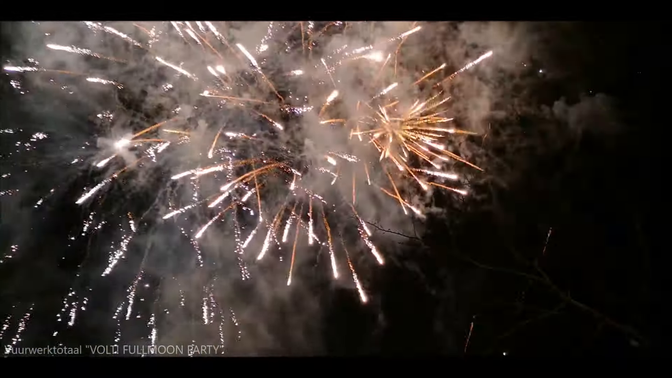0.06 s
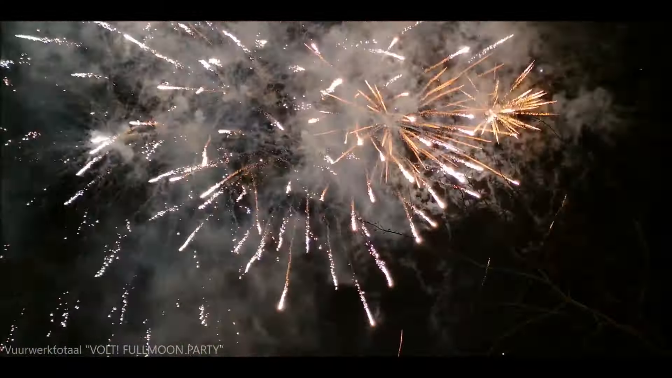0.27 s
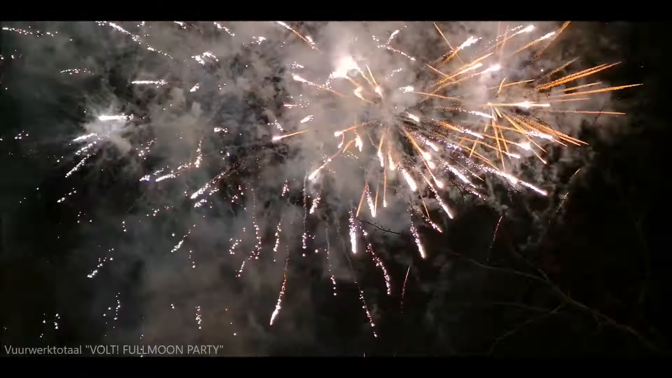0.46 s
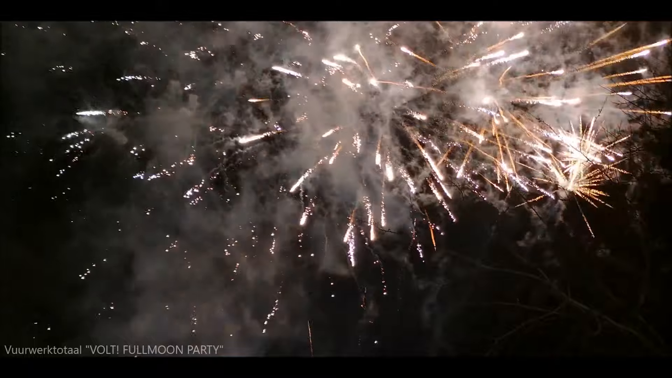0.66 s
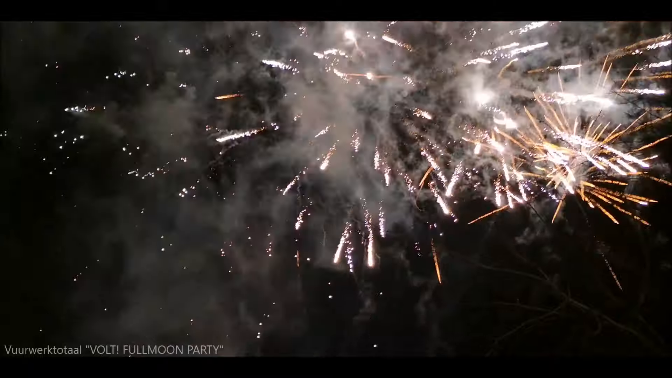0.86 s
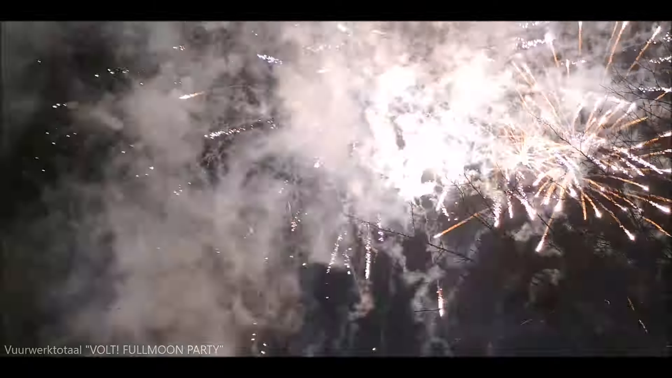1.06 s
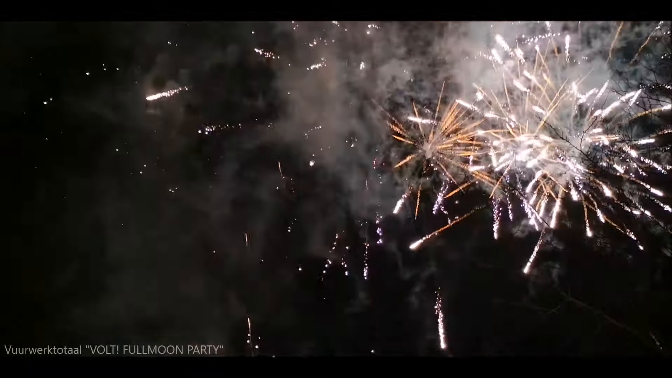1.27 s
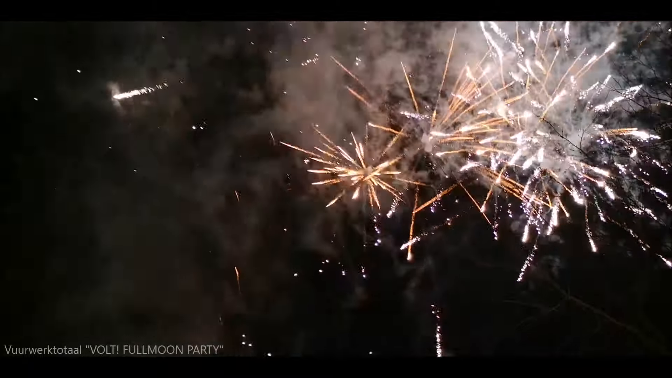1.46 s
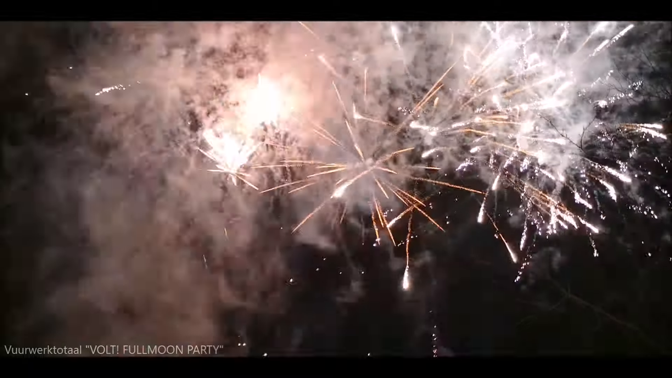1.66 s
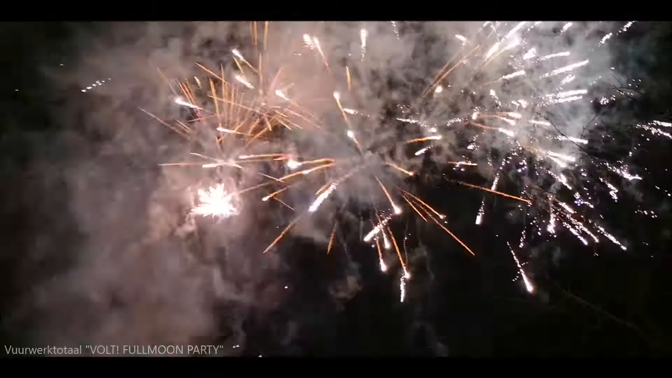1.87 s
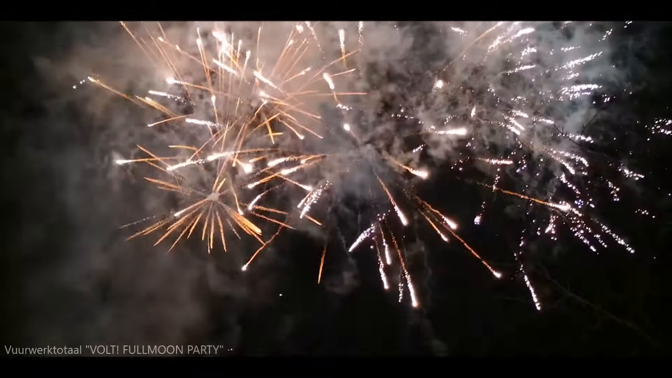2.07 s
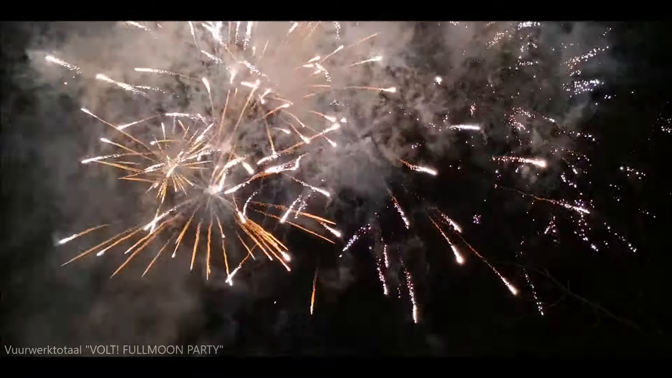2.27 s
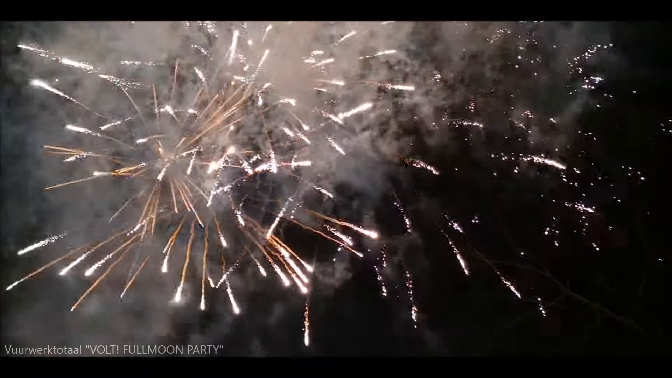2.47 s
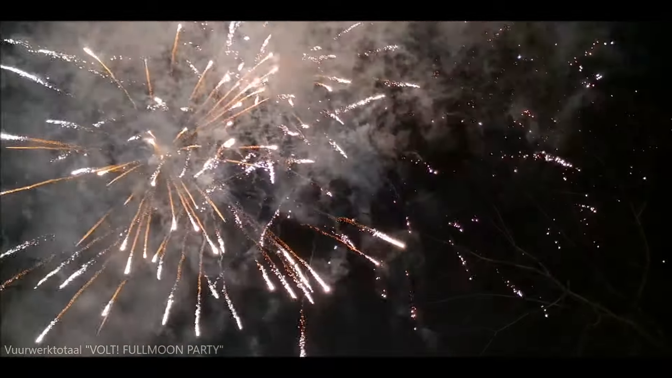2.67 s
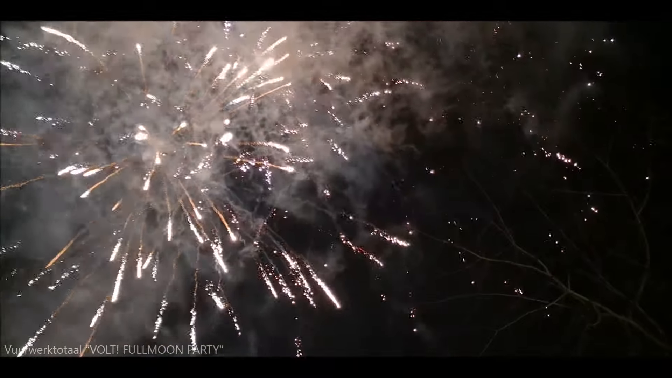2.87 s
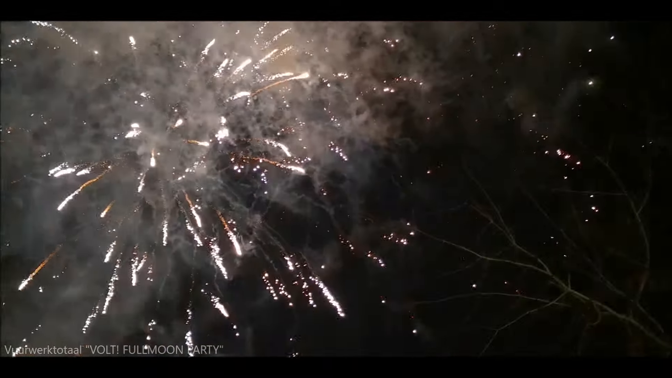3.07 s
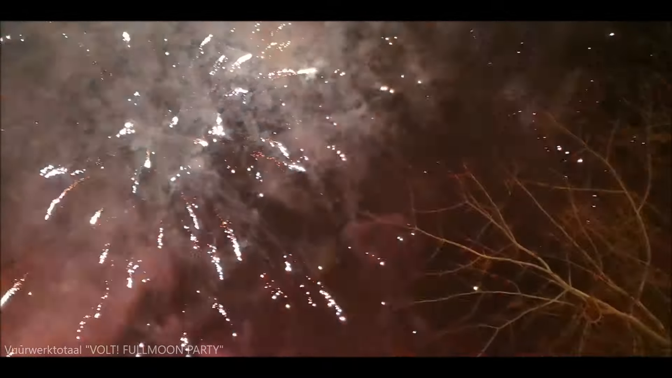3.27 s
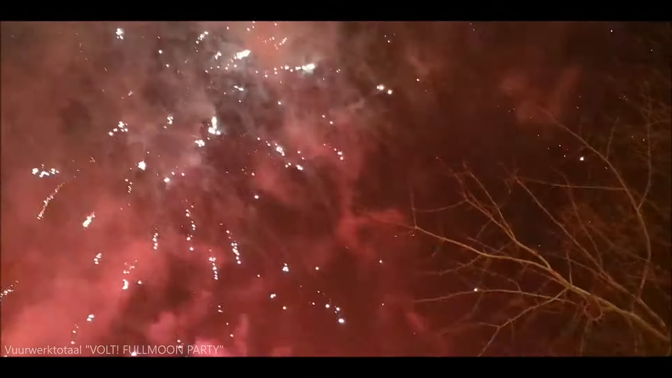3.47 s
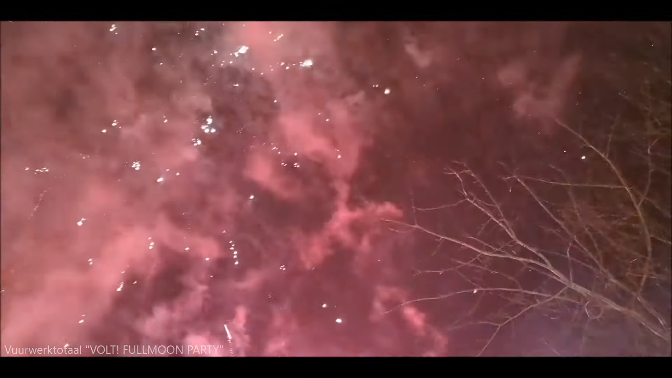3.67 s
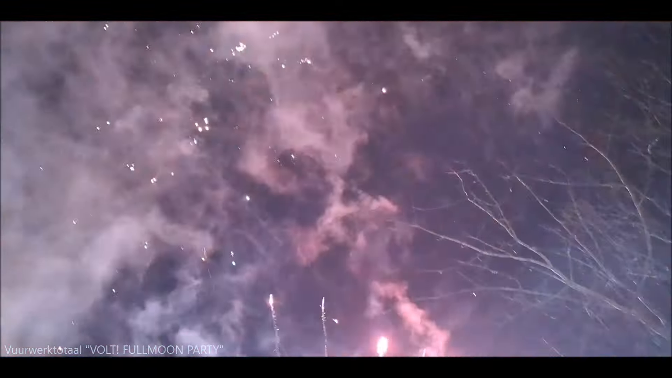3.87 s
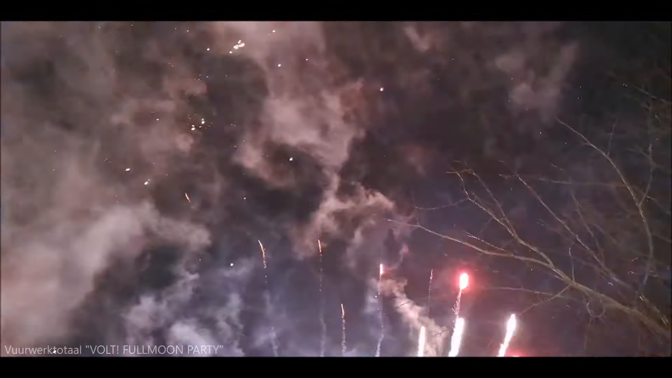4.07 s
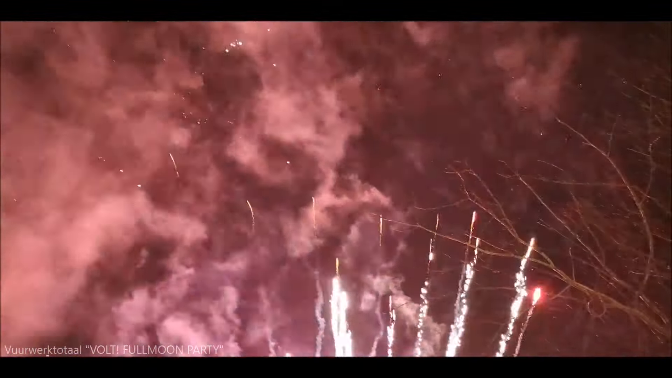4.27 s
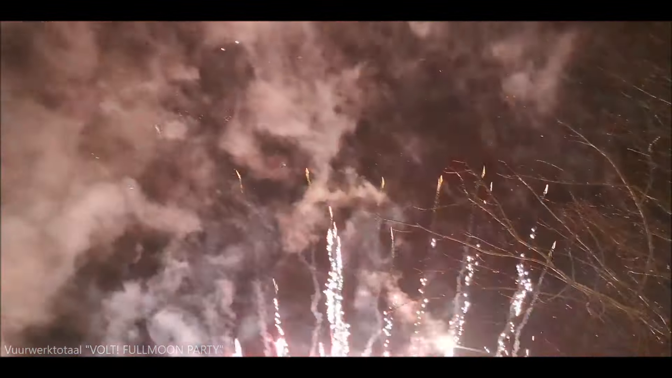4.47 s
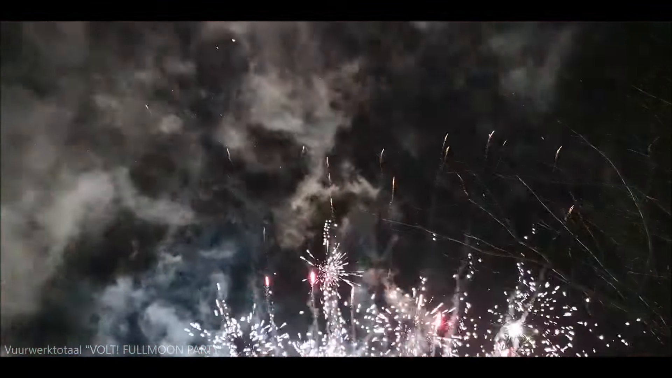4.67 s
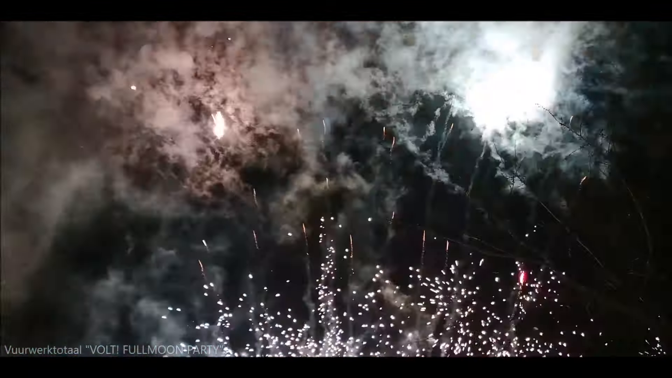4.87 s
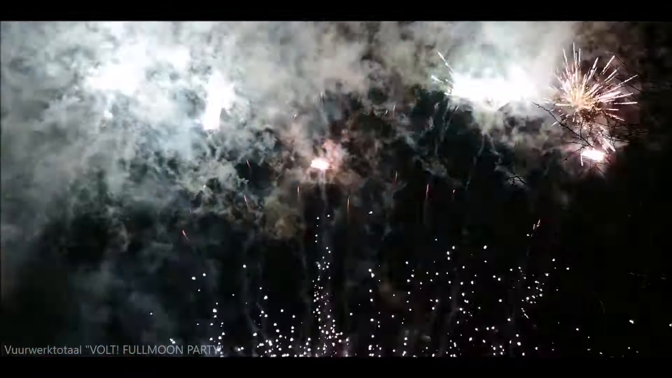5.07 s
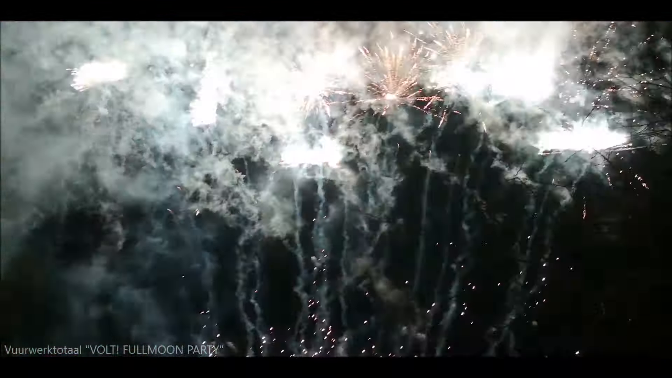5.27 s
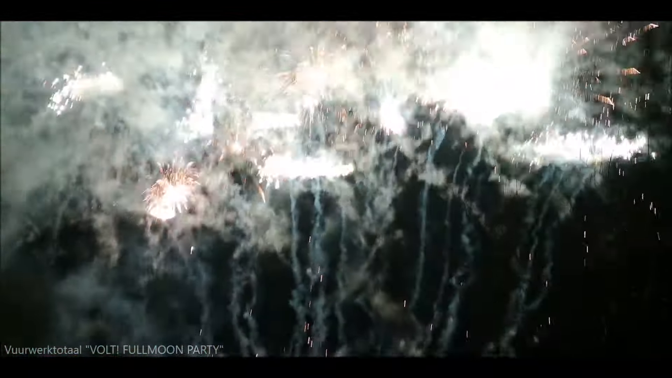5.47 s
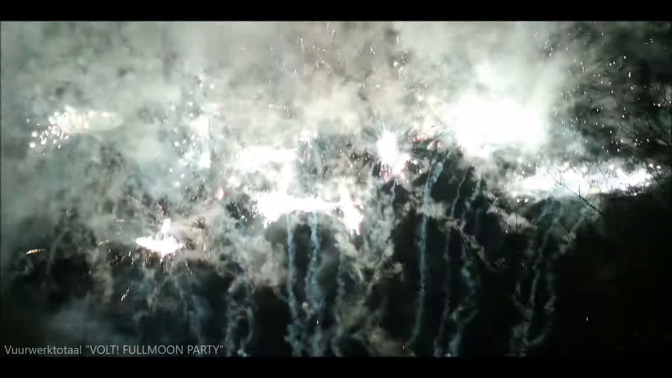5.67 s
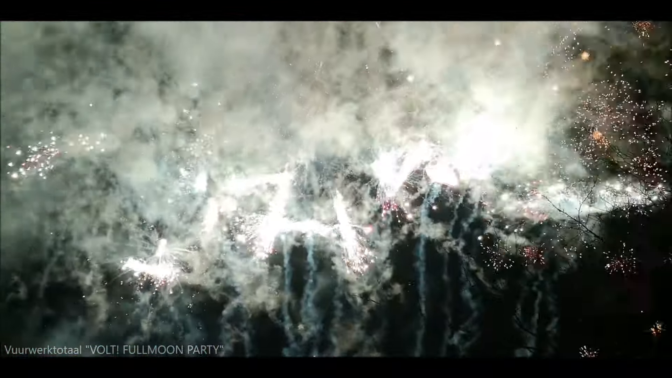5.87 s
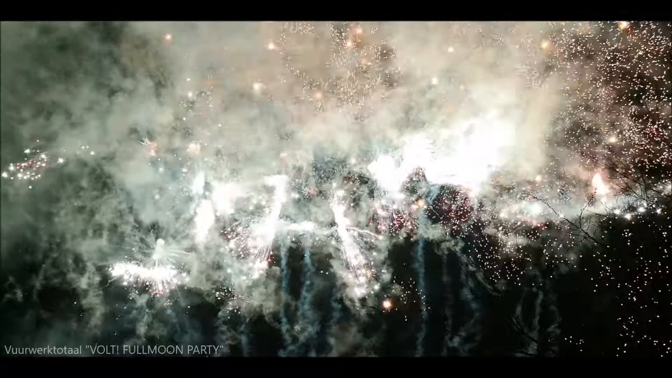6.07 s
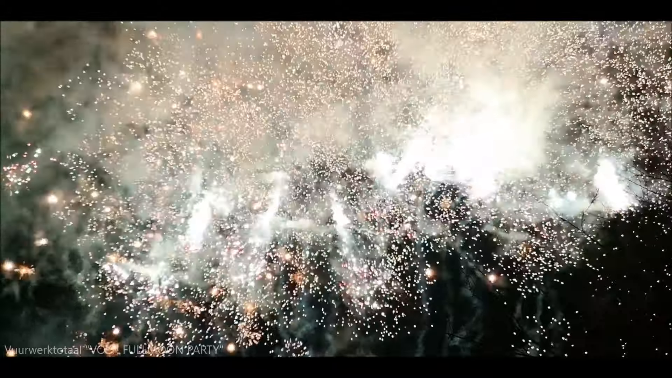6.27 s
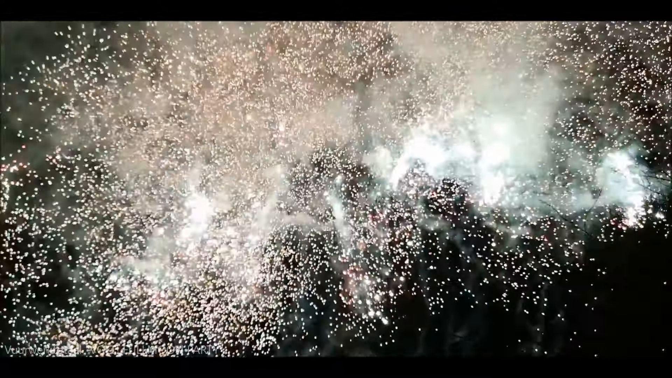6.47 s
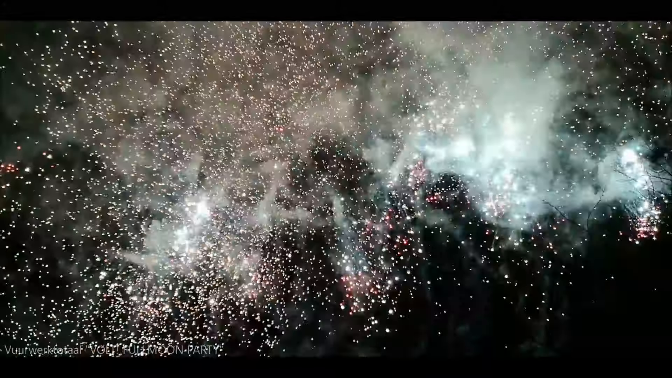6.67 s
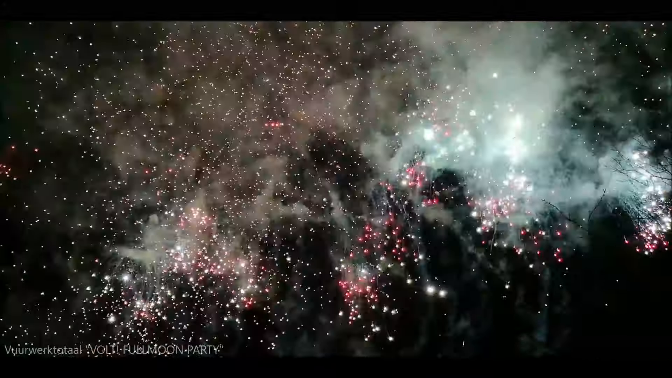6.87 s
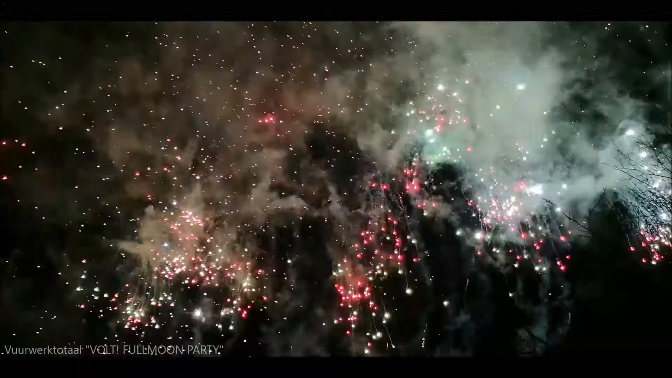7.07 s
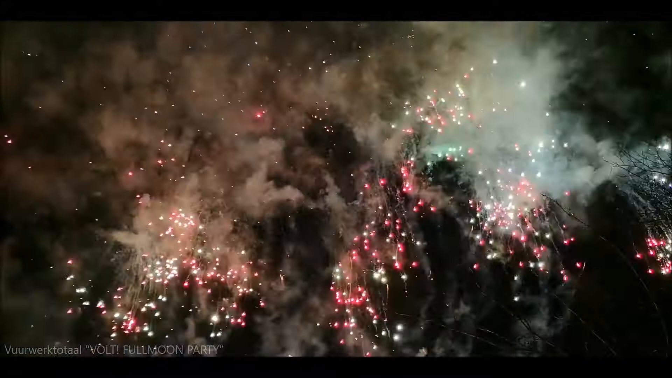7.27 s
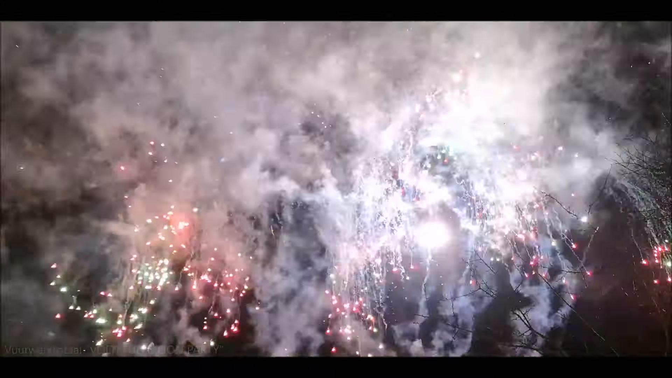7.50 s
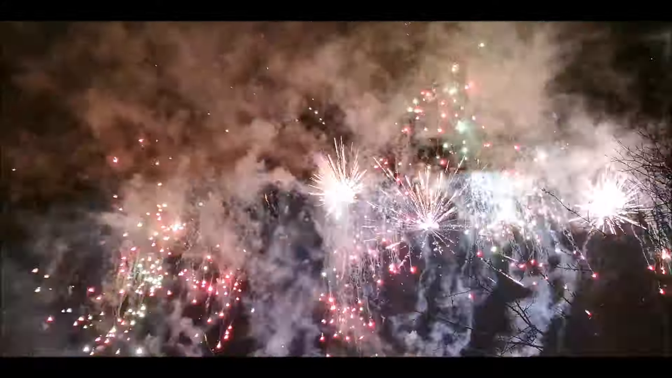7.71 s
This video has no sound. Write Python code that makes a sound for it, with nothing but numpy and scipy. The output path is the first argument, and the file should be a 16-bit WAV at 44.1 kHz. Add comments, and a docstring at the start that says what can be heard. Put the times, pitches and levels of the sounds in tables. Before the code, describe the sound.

A multi-shot firework bangs overhead, fires quick thumping volleys, then fills the night air with waves of dense crackling over a distant rumble.

```python
"""A fireworks cake outdoors at night, close enough to overload a phone's two microphones.
Over the echo of an earlier shell, a few tubes thump and shells burst overhead, each shock followed by
its bounce off the ground. Roll and hiss pile up, dipping at each bang. Past three seconds a quick volley
leaves the tubes and a cloud of crackling stars swells and thins. More shells burst just after five
seconds; a last short volley fires amid more crackle, and one more cloud closes the scene."""
import sys
import numpy as np
from scipy import signal
from scipy.fft import rfft, irfft
from scipy.io import wavfile

SR = 44100
rng = np.random.default_rng(int(sys.argv[2]) if len(sys.argv) > 2 else 0)


def dump(signal):
    """Clip the signal to [-1, 1] and save it as 16-bit WAV at the path in sys.argv[1]."""
    limited = np.clip(np.atleast_2d(signal).T, -1, 1)
    pcm = np.round(limited * 32767).astype(np.int16)
    wavfile.write(sys.argv[1], SR, pcm)


N = 341325
TIME = np.arange(N) / SR
COARSE_TIME = TIME[::32]  # for slowly moving levels
LEFT_MINUS_RIGHT = np.array([[1], [-1]])


def undb(db):
    """Decibels to gain."""
    return 10 ** (np.asarray(db) / 20)


def unit(x):
    """Scale to rms 1."""
    return x / np.sqrt(np.mean(x ** 2))


def colour(x, points):
    """Causal filter with a spectrum of (Hz, dB) points; white noise keeps its power."""
    size = 4096
    hz, db = np.transpose(points)
    bin_hz = np.maximum(np.arange(size // 2 + 1) * SR / size, 1)
    gain = unit(undb(np.interp(np.log(bin_hz), np.log(hz), db)))
    cepstrum = irfft(np.log(gain))
    cepstrum[1:size // 2] *= 2  # fold to minimum phase
    cepstrum[size // 2 + 1:] = 0
    impulse = irfft(np.exp(rfft(cepstrum)))
    return signal.fftconvolve(x, impulse[None], axes=1)[:, :N]


def shade(x, points):
    """Weight a long sound by a spectrum of (Hz, dB) points."""
    hz, db = np.transpose(points)
    bin_hz = np.arange(N // 2 + 1) * SR / N
    return irfft(rfft(x) * undb(np.interp(bin_hz, hz, db)), N)


def add(out, s, sound, lag=0):
    """Mix a sound in at s seconds; the left microphone hears it lag samples after the right."""
    for channel, part in enumerate(np.broadcast_to(sound, (2, sound.shape[-1]))):
        start = max(int(s * SR) - lag // 2 + (lag if channel == 0 else 0), 0)
        room = max(min(len(part), N - start), 0)
        out[channel, start:start + room] += part[:room]


def widen(pair, side_db):
    """Two unrelated signals, taken as mid and side, become left and right."""
    return unit(pair[0] + undb(side_db) * pair[1] * LEFT_MINUS_RIGHT)


def grains(per_s, spread_db, channels=2):
    """Random impulses: many small, a few large."""
    size = undb(spread_db * np.minimum(rng.exponential(size=(channels, N)), 3))
    return size * (rng.random((channels, N)) < per_s / SR)


def lobe(t, peak_s):
    """A smooth push that peaks at 1 and dies away."""
    return (t / peak_s * np.exp(1 - t / peak_s)) ** 2


def ring(t, modes, detune):
    """Damped (Hz, decay s, dB) modes, tuned a little differently at every shot."""
    out = 0
    for hz, decay_s, db in modes:
        pitch_hz = hz * (1 + detune * rng.standard_normal())
        out = out + undb(db) * np.exp(-t / decay_s) * np.sin(2 * np.pi * pitch_hz * t)
    return out


def spit(t, decay_s):
    """A very short rush of unit energy, different at each microphone."""
    noise = rng.standard_normal((2, len(t))) * np.exp(-t / decay_s)
    return noise / np.linalg.norm(noise, axis=1, keepdims=True)


def tails(shots, db, fall_db_per_s):
    """Level left by (s, relative dB) shots: each dies away steadily and their powers add up."""
    t, power = COARSE_TIME, 0
    for s, shot_db in shots:
        level = undb(db + shot_db - fall_db_per_s * np.maximum(t - s, 0))
        power = power + (t >= s) * level ** 2
    return np.interp(TIME, t, np.sqrt(power))


def lingering_shots():
    """Three lists of (s, relative dB): the shells' far echoes, the shells' hiss and the launches."""
    earlier_shell_s = -0.17  # still echoing as the scene opens
    echoes = [(earlier_shell_s, 2.5)] + [(s, echo_db) for s, *_, echo_db, _ in BURSTS]
    hisses = [(earlier_shell_s, 0)] + [(s, hiss_db) for s, *_, hiss_db in BURSTS]
    return echoes, hisses, [(s, 0) for s, *_ in LAUNCHES]


def dips():
    """Gain of the background: it drops at each bang and under the crackle; the deepest dip counts."""
    t = COARSE_TIME
    db = np.zeros(len(t))
    for shots, depth_db, hold_s, recovery_s in ((BURSTS, -10, 0.028, 0.094), (LAUNCHES, -4, 0.014, 0.096)):
        corners_s = [0, hold_s, hold_s + recovery_s]
        for s, *_ in shots:
            db = np.minimum(db, np.interp(t - s, corners_s, [depth_db, depth_db, 0], left=0))
    depth_db, attack_s, hold_s, recovery_s = -9.5, 0.038, 0.199, 0.094
    for start_s, swell_s, thin_s, *_ in CLOUDS:
        rise_s = start_s + swell_s + thin_s + hold_s
        corners_s = [start_s, start_s + attack_s, rise_s, rise_s + recovery_s]
        db = np.minimum(db, np.interp(t, corners_s, [0, depth_db, depth_db, 0]))
    return np.interp(TIME, t, undb(db))


# The roll sounds wide from about 500 Hz up and nearly centred in the bass.
# Each row: frequency in Hz, gain of the side signal in dB.
ROLL_WIDTH = [(60, -17), (200, -11.5), (320, -6), (480, 8.5), (700, 11.5), (1100, 12)]

def rumble(spectrum, side_db):
    """A dense train of dull reflections."""
    reflections = grains(per_s=700, spread_db=2.5) * rng.choice([-1, 1], (2, N))
    mid, side = colour(reflections, spectrum)
    return (mid + undb(side_db) * shade(side, ROLL_WIDTH) * LEFT_MINUS_RIGHT) / np.std(mid)


# The distant roll after shells, tubes and crackle. Each row: frequency in Hz, relative level in dB.
SHELL_ROLL_COLOUR = [(20, -12.5), (50, -12.5), (90, -1.5), (150, -2.5), (270, -3), (400, -8.5),
                     (600, -18.5), (1000, -24), (2500, -77)]
TUBE_ROLL_COLOUR = [(20, -10), (50, -4.5), (110, -4), (170, -1.5), (230, 0.5), (310, -5.5), (450, -14),
                    (800, -26.5), (2500, -58)]
CLOUD_ROLL_COLOUR = [(20, -15), (60, -6), (120, -10.5), (220, 2), (300, -4.5), (450, -14), (1000, -44)]

def distant_roll():
    """The surroundings roll back every shot and cloud, over the steady low murmur of the night."""
    shells, _, tubes = lingering_shots()
    dip, murmur = dips(), undb(-42)
    shell_level = dip * tails(shells, db=-26.5, fall_db_per_s=13.1)
    tube_level = dip * tails(tubes, db=-32.5, fall_db_per_s=25)
    cloud_level, _ = cloud_levels()
    deep = shell_level * rumble(SHELL_ROLL_COLOUR, side_db=0)
    thin = np.hypot(tube_level, murmur) * rumble(TUBE_ROLL_COLOUR, side_db=-2)
    return deep + thin + undb(-21.5) * cloud_level * rumble(CLOUD_ROLL_COLOUR, side_db=-1.5)


# Echoes off far walls. Each row: arrival in seconds, level in dB, nominal pitch in Hz.
WALL_ECHOES = [(0.077, -13, 156), (0.954, -11, 159), (1.469, -13, 156), (1.993, -13, 156),
               (2.013, -16, 156), (2.228, -12.5, 112), (2.528, -18, 156), (2.704, -14.5, 170),
               (5.829, -9.5, 149), (5.847, -16, 156), (5.925, -9, 110), (5.941, -8.5, 100),
               (5.978, -15.5, 240), (5.987, -13, 216)]

def wall_echoes():
    """A few far walls answer with a dull thud of their own."""
    out = np.zeros((2, N))
    t = np.arange(SR // 15) / SR
    for s, db, hz in WALL_ECHOES:
        add(out, s, undb(db) * ring(t, [(hz, 0.008, 0)], detune=0.11))
    return out


# Reports off trees and roofs, the hiss overhead, and the top that hiss loses from far off.
# Each row: frequency in Hz, relative level in dB.
REPORT_COLOUR = [(150, -23), (400, -3), (700, 0.5), (1000, -4.5), (1700, 0.5), (2200, -0.5), (2800, -5),
                 (3300, -12.5), (4200, -15), (5500, -20.5), (9000, -46)]
HISS_COLOUR = [(1200, 0.5), (2800, 4.5), (4000, -1.5), (5200, 0.5), (6300, -1), (7800, 1), (9400, -2),
               (10300, -12.5), (12500, -20), (15000, -25)]
FAR_COLOUR = [(3000, 1.5), (8500, 0), (11000, -20)]

def reports_and_hiss():
    """Reports scatter off trees and roofs while flying stars fizz: briefly nearby, long from afar."""
    near_delay_s, far_pop_s, comets_s = 0.057, 2.704, 4.236
    echoes, hisses, tubes = lingering_shots()
    reports = widen(rng.standard_normal((2, N)) + 3 * grains(per_s=900, spread_db=3), side_db=-0.5)
    fizz = widen(rng.standard_normal((2, N)) + grains(per_s=1500, spread_db=2), side_db=0)
    far_pop = tails([(far_pop_s, 0)], db=-25, fall_db_per_s=380)

    near_echoes = tails([(s + near_delay_s, db) for s, db in hisses], db=-30.5, fall_db_per_s=120)
    far_echoes = tails(echoes, db=-28, fall_db_per_s=10.45)
    tube_echoes = tails(tubes, db=-34, fall_db_per_s=27)
    report_level = np.linalg.norm([near_echoes, far_echoes, tube_echoes, far_pop], axis=0)

    near_hiss = tails(hisses, db=-17, fall_db_per_s=91)
    tube_hiss = tails(tubes, db=-32, fall_db_per_s=80)
    comets = tails([(comets_s, 0)], db=-34, fall_db_per_s=9)  # they fizz on after the long volley
    fizz_level = np.linalg.norm([near_hiss, tube_hiss, comets, undb(-6) * far_pop], axis=0)
    far_level = tails(hisses, db=-31.5, fall_db_per_s=27)
    far_fizz = shade(rng.standard_normal((2, N)), FAR_COLOUR) * far_level
    hiss = colour(fizz * fizz_level + far_fizz, HISS_COLOUR)
    return (colour(reports, REPORT_COLOUR) * report_level + hiss) * dips()


def pop(t):
    """One crackling star: a tiny shock and a ragged tail."""
    shock = np.exp(-t / (0.00002 * rng.uniform(0.5, 2)))
    return shock / np.linalg.norm(shock) + 0.8 * spit(t, decay_s=0.0013)


# Crackle heard from the ground, and its echoes, which lose treble on their way.
# Each row: frequency in Hz, relative level in dB.
CRACKLE_COLOUR = [(260, -42), (450, -16), (553, -15.5), (649, -12.5), (994, -5), (1220, -6.5), (1610, 0),
                  (1870, 0), (2070, -0.5), (2290, -1.5), (4120, -6.5), (7750, -5), (9240, -8),
                  (10200, -17.5), (15000, -31)]
WASH_COLOUR = [(500, -0.5), (2200, 3), (4000, 0.5), (9000, -3.5)]

def steady_crackle(directions=20):
    """Stars pop by the hundred from many directions, over the wash of their own echoes."""
    t = np.arange(SR // 200) / SR
    out = np.zeros((2, N))
    for _ in range(directions):
        stars = signal.oaconvolve(grains(per_s=45, spread_db=4, channels=1), pop(t), axes=1)
        pan = undb(1.5 * rng.standard_normal() * LEFT_MINUS_RIGHT)
        add(out, 0, stars * pan, lag=rng.integers(-9, 12))
    wash = shade(widen(rng.standard_normal((2, N)), side_db=0), WASH_COLOUR)
    return unit(colour(unit(out) + 0.94 * wash, CRACKLE_COLOUR))


# Clouds of stars overhead. Each row: start, swelling time and thinning time in seconds,
# relative crest level in dB, treble at the start and at the end in dB.
CLOUDS = [(4.511, 0.23, 0.33, -15.5, -4.5, -6), (6.03, 0.19, 0.14, -17, -2, -8),
          (6.335, 0.16, 0.29, -14.5, -6, -9.5), (7.026, 0.35, 0.25, -15.5, -4, -7)]

def cloud_levels():
    """Body and treble levels: each cloud sets in, arches over its crest and stops, leaving stragglers."""
    onset_s, release_s, arch_db = 0.014, 0.01, -4.4
    straggler_db, straggler_s = -5, 0.27
    body_lag_s = 0.023  # the first stars are thin and bright; the body fills in behind them
    t, body_power, treble_power = COARSE_TIME, 0, 0
    for start_s, swell_s, thin_s, db, first_treble_db, last_treble_db in CLOUDS:
        crest_s, end_s = start_s + swell_s, start_s + swell_s + thin_s
        from_crest = np.interp(t, [start_s, crest_s, end_s], [-1, 0, 1])
        after_s = np.maximum(t - end_s, 0)
        stragglers = undb(straggler_db) * np.exp(-after_s / straggler_s)
        release = np.maximum(np.exp(-after_s / release_s), stragglers)
        level = undb(db + arch_db * from_crest ** 2) * release
        body_onset = np.exp(np.minimum(t - start_s - body_lag_s, 0) / onset_s)
        treble_onset = np.exp(np.minimum(t - start_s, 0) / onset_s)
        brightness = undb(np.interp(t, [start_s, end_s], [first_treble_db, last_treble_db]))
        body_power += (level * body_onset) ** 2
        treble_power += (level * treble_onset * brightness) ** 2
    return np.interp(TIME, t, np.sqrt(body_power)), np.interp(TIME, t, np.sqrt(treble_power))


def crackle_clouds(crackle):
    """Crackle swells and thins in clouds; nearer ones keep more of their treble."""
    body = signal.sosfiltfilt(signal.butter(3, 3700, fs=SR, output="sos"), crackle)
    body_level, treble_level = cloud_levels()
    return undb(-2.5) * body_level * unit(body) + treble_level * unit(crackle - body)


# Stars that stand out overhead; the pop at 4.477 s is the ground's bounce of the one just before it. # Each
# row: start in seconds, relative level in dB, left minus right in dB.
POPS = [(4.4688, 1, 0), (4.477, -7, 2), (4.51, -7, -23), (4.5149, 2, -2), (4.9552, -15, 4), (4.9698, -1, 5),
        (4.9955, -3, 5), (5.02, -6, 1), (5.05, -8, -2), (5.063, -3.5, 2), (5.1508, -1, 5), (5.344, -6.5, 0),
        (6.0232, 0, 2), (6.6824, -18, -3), (6.726, -6, 2), (6.801, -1, 1.0), (6.845, -16, 17),
        (6.876, -7, 3.0), (6.8838, -9, 7), (6.974, -2.5, 8), (6.978, -2, -8), (6.9867, -3, 2),
        (7.019, 3.5, -2), (7.033, -6, -6), (7.5902, 0, 5), (7.6578, -1, 6), (7.6838, -4.5, 3),
        (7.7102, 0.5, -2)]

def single_stars(crackle):
    """A star pops on its own and sputters on briefly."""
    t = np.arange(SR // 200) / SR
    pops = np.zeros((2, N))
    for s, db, pan_db in POPS:
        add(pops, s, pop(t) * undb(db + 2 + pan_db / 2 * LEFT_MINUS_RIGHT), lag=rng.integers(-8, 9))
    sputter = crackle * tails([(s, db) for s, db, _ in POPS], db=-30.5, fall_db_per_s=590)
    return colour(pops, CRACKLE_COLOUR) + sputter


# A tube's hollow tone, and the snap of tubes and shells. Each row: frequency in Hz, relative level in dB.
TUBE_COLOUR = [(60, 6.5), (350, 0.5), (500, -7.5), (750, -3), (1050, 0), (1500, 2.5), (1800, -2),
               (2150, -0.5), (2700, -8), (6000, 1)]
SNAP_COLOUR = [(600, -18), (1800, 2), (2700, 3), (4000, -6.5), (6000, -6), (7800, 5), (9300, 3.5),
               (10500, -9), (13000, -22), (16000, -20)]
# A tube's bark. Each row: multiple of its ring pitch, decay time in seconds, relative level in dB.
TUBE_MODES = [(.86, 0.0029, -8), (1.1, 0.0019, -2), (1.68, 0.0036, -12.5)]
# Tubes firing close to the microphones. Each row: start in seconds, relative levels of thump,
# ring and snap in dB, ring pitch in Hz.
LAUNCHES = [(0.113, 1, -4.5, -10, 1200), (0.3093, -0.5, -9, -4, 1200), (0.504, -2.5, -11, -9, 1260),
            (0.6794, -0.5, -0.5, -16, 1240), (0.9784, -11, -3, -3, 1350.0), (3.3563, -5.5, 5.5, -9, 1280),
            (3.3989, -3.5, 1.5, -11, 1160), (3.4442, -4, 0.5, -9.5, 1190), (3.49, -6.5, -3, -5, 1190),
            (3.5537, -1.5, 3.5, -4, 1150), (3.5958, -3.5, -1, -6, 1280), (3.6383, -5.5, -2.5, -6, 1190),
            (3.6791, -15, -1.5, -10, 1250), (3.7279, -11, 0.5, -8, 1440), (3.7646, -2, 0.5, -12, 1300),
            (3.8104, -2.5, 0, -8, 1210.0), (3.8589, -4, -6, -2.5, 1100), (3.8959, -1, -5, -2, 1150),
            (3.932, -4.5, -3, -3, 1170), (3.9653, -5.5, -2, -8, 1230.0), (4.0128, -8.5, -2, -10, 1270),
            (4.049, -8.5, -1, -28, 1230), (4.102, -6, 1, -10, 1350), (4.156, -1, 5, -3, 1260),
            (4.1893, -5, 0.5, -4, 1230), (4.2351, -4, 1.5, 0.5, 1280), (4.2795, -4, 1, 0, 1300),
            (4.3274, -12, -2.5, -3.5, 1500), (4.37, -12, -1, -10, 1290), (6.2987, -8.5, -5, -17, 1300),
            (6.3373, -3.5, -3, -18, 1310), (6.3772, -3, -10, -17, 1300), (6.422, -1, -10, -15, 1300),
            (6.455, -1.5, -4.5, -9, 1310), (6.4877, -5, -17.0, -15, 1300), (6.5407, -3.5, -3, -11, 1320),
            (6.5807, -4.5, -8, -15, 1320)]

def launches():
    """A lift charge: a pressure front, one heavily damped swing of the gas and the bark of the tube."""
    out, snaps = np.zeros((2, 2, N))
    t = np.arange(SR // 30) / SR
    for s, thump_db, ring_db, snap_db, ring_hz in LAUNCHES:
        modes = [(ring_hz * ratio, decay_s, db) for ratio, decay_s, db in TUBE_MODES]
        bark = np.array([ring(t, modes, detune=0.08) for _ in range(2)])
        add(out, s, 0.43 * lobe(t, 0.00011) + 0.5 * undb(ring_db) * bark, lag=3)
        add(out, s - 0.0005, 0.38 * undb(thump_db) * lobe(t, 0.0012))
        gas_swing = ring(t, [(188, 0.0013, 0.0073)], detune=0.14)
        add(out, s + 0.00067, -1.9 * undb(thump_db) * gas_swing)
        wad_snap = spit(t, decay_s=0.00039)
        gas_rush = 0.45 * spit(t, decay_s=0.002)
        add(snaps, s, undb(snap_db + 4.5) * (wad_snap + gas_rush), lag=3)
    return colour(out, TUBE_COLOUR) + colour(snaps, SNAP_COLOUR)


# A shell's crack. Each row: frequency in Hz, decay time in seconds, relative level in dB.
SHELL_MODES = [(840, 0.00027, -47.5), (1350, 0.00046, -18), (1610, 0.0017, -2.5), (2870, 0.00021, -28)]
# Shells bursting overhead. Each row: start and delay of the ground bounce in seconds, relative levels
# of blast, crack and snap in dB, lag at the left microphone in samples, relative level of the
# far echo in dB, and of the hiss and near echo in dB.
BURSTS = [(0.147, 0.0085, -18, -6, -7, 2, -3.5, -3), (0.376, 0.0084, -14, -2.5, -4, 6.5, 2.5, -2),
          (0.7531, 0.0073, -10.5, 1.5, -2.5, 10.5, -1.5, -2.5), (0.794, 0.0076, -22, 1, -3.5, 10, -6.5, -3),
          (1.1455, 0.0077, -16, 0, -1.5, 6.5, -2.5, -2), (1.3099, 0.0084, -12, 1.5, -3.5, 5, -0.5, -2.5),
          (1.5723, 0.008, -12.5, -1, -5, 2, -2, -2.5), (1.8366, 0.0078, -10, 1, -1, -1.5, 0.5, -3.5),
          (1.8687, 0.0086, -17, -3, -10, 1, -3, -3), (2.0729, 0.0072, -8.5, 0, -2.5, -3, -1, -1),
          (2.3846, 0.0072, -8.5, 5.5, 0, -3.5, 0.5, -1), (5.227, 0.0079, -6.5, 3, -3, 9.5, 3, -3),
          (5.382, 0.0085, -18, 0, -7, 6.5, 0.5, -9), (5.4212, 0.0089, -18, -3, -5, 7.5, -1, -6),
          (5.4698, 0.0083, -21, -6, -7, 2, 1.5, -7), (5.5244, 0.0086, -17, -2, -5.5, 6, 0, -2),
          (5.6008, 0.0078, -16, -6, -6, 1, -7, -7.5), (5.6692, 0.0078, -18, -0.5, -6, -2, -2, -7),
          (5.6921, 0.0087, -19, -17, -8, 3, 0, -3)]

def shell_bursts():
    """Each shell sends a steep shock and a suction trough, first directly, then off the ground."""
    out, snaps, rasps = np.zeros((3, 2, N))
    t = np.arange(SR // 3) / SR
    for s, bounce_s, blast_db, crack_db, snap_db, lag, *_ in BURSTS:
        lag = round(lag)
        direct = 0.68 * lobe(t, 0.00011) - 1.42 * undb(0.59 * blast_db) * lobe(t, 0.0014)
        bounce = 0.69 * lobe(t, 0.00012) - undb(0.5 * blast_db) * lobe(t, 0.0016) ** 5.5
        for arrival_s, shock, path_db in ((s, direct, 0), (s + bounce_s, bounce, -1.5)):
            crack = np.array([ring(t, SHELL_MODES, detune=0.096) for _ in range(2)])
            add(out, arrival_s, shock + 0.41 * undb(crack_db + path_db) * crack, lag)
            # a short rough rasp follows each crack, different at each microphone
            add(rasps, arrival_s, undb(crack_db + path_db - 0.5) * spit(t, decay_s=0.00069), lag)
            add(snaps, arrival_s, undb(snap_db + path_db + 5) * spit(t, decay_s=0.00049), lag)
        # a strong blast pushes the microphone off its rest; it swings back slowly
        swing = 0.29 * lobe(t, 0.062) - 0.54 * lobe(t, 0.011)
        add(out, s, undb(blast_db) * swing)
    return out + colour(rasps, REPORT_COLOUR) + colour(snaps, SNAP_COLOUR)


def scene():
    """Everything heard from beside the cake."""
    bangs = shell_bursts() + launches()
    background = distant_roll() + wall_echoes() + reports_and_hiss()
    crackle = steady_crackle()
    return background + crackle_clouds(crackle) + single_stars(crackle) + bangs


# The left microphone is a little brighter in the presence range, the right one at the top.
# Each row: frequency in Hz, left minus right in dB.
MIC_BALANCE = [(500, -.1), (1400, 1.2), (2600, -.7), (4300, 2.4), (6500, 2.4), (9000, -.3), (12000, -1.4)]

def record(dry):
    """The phone's two microphones differ slightly; it flattens the highest peaks and cuts the top."""
    top_hz = 15300
    left = shade(dry[0], [(hz, db / 2) for hz, db in MIC_BALANCE])
    right = shade(dry[1], [(hz, -db / 2) for hz, db in MIC_BALANCE])
    heard = np.array([left, right])
    overloaded = heard / (1 + heard ** 6) ** (1 / 6)
    return signal.sosfilt(signal.ellip(8, 0.2, 70, top_hz, fs=SR, output="sos"), overloaded)


dry = scene()
out = record(dry)
dump(out)
```